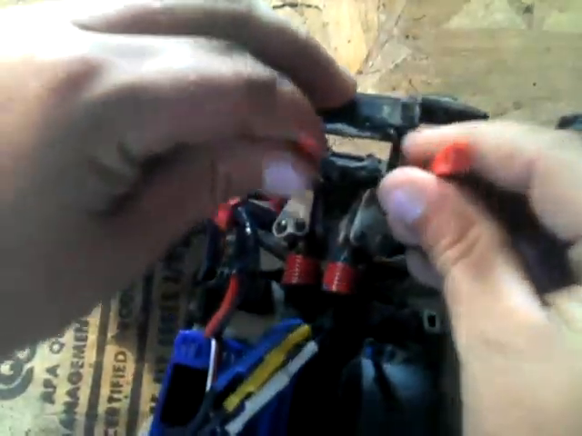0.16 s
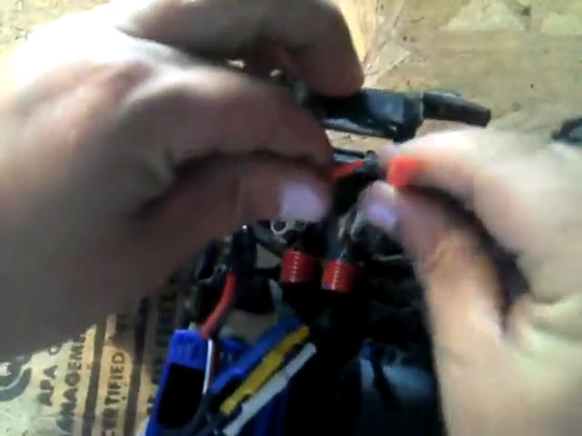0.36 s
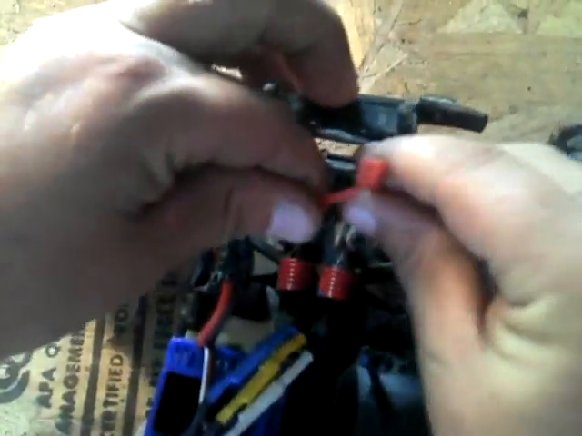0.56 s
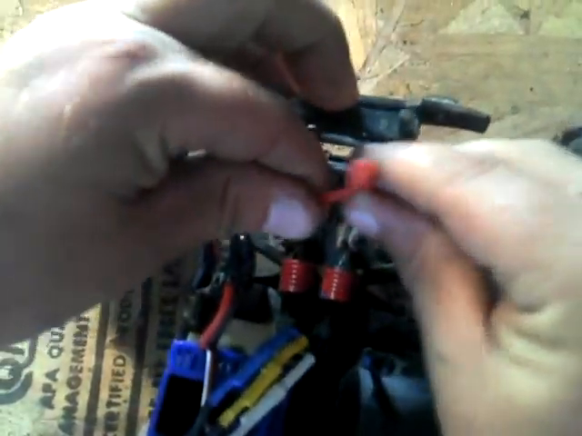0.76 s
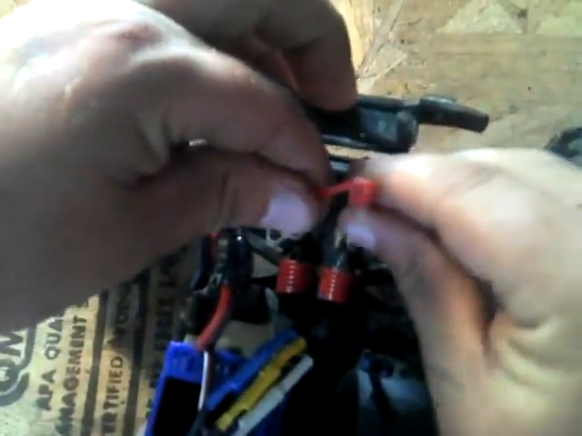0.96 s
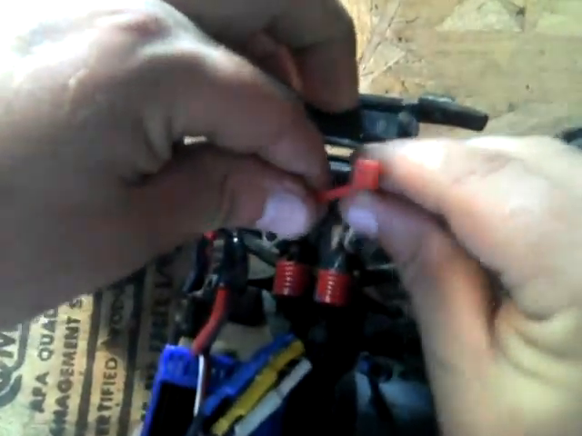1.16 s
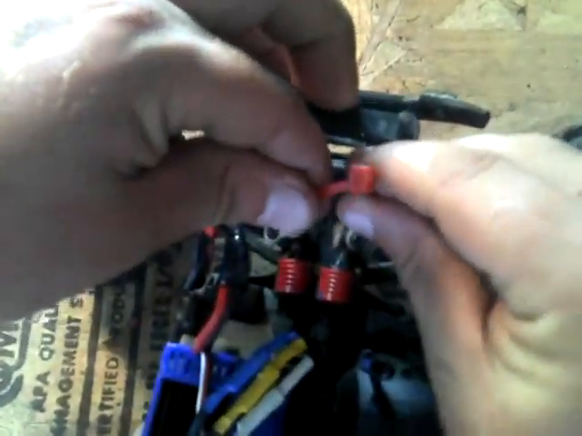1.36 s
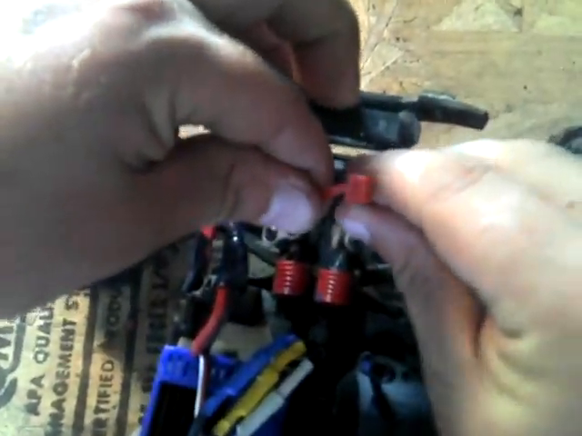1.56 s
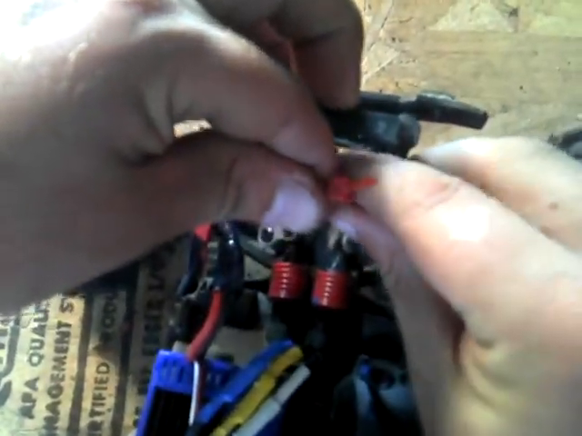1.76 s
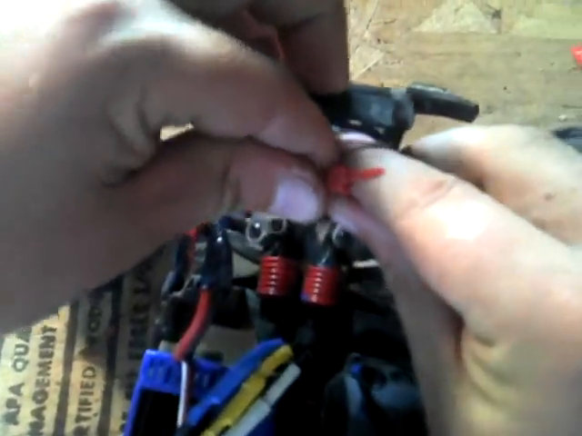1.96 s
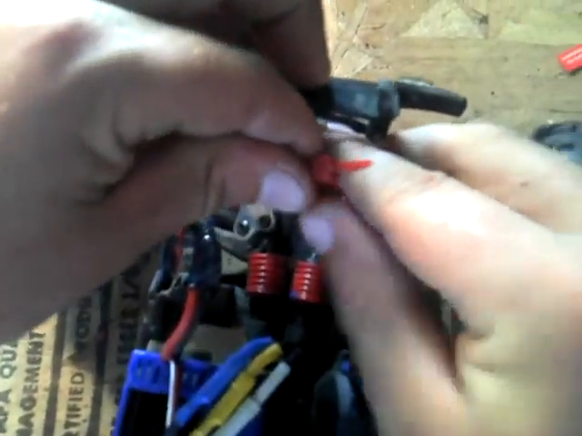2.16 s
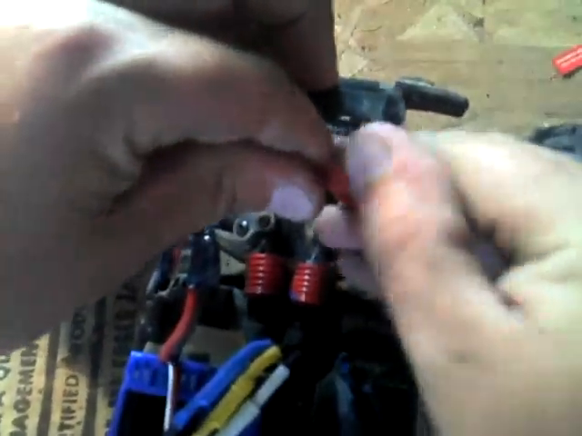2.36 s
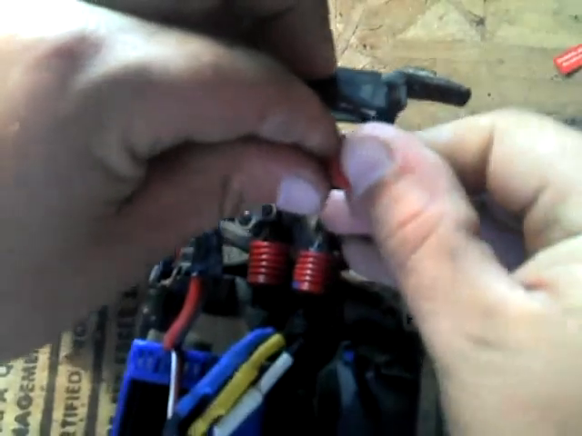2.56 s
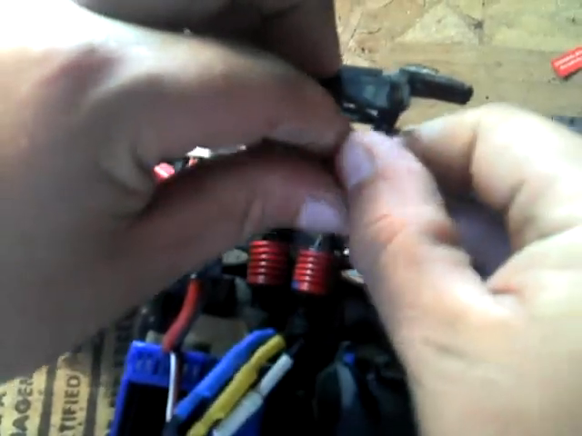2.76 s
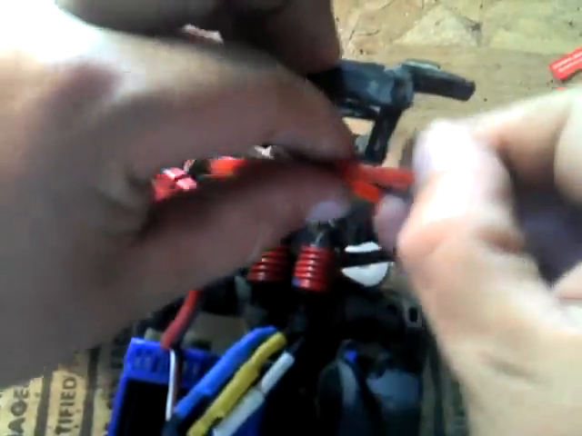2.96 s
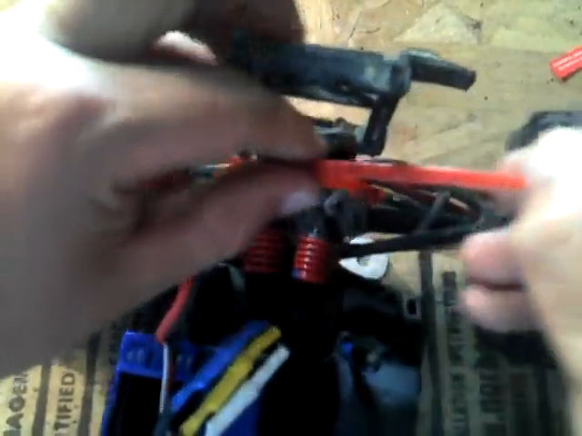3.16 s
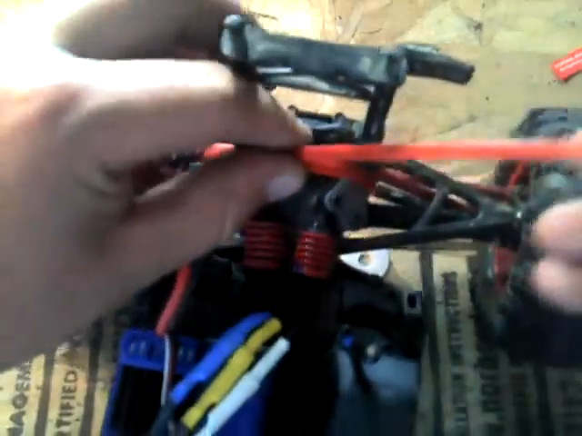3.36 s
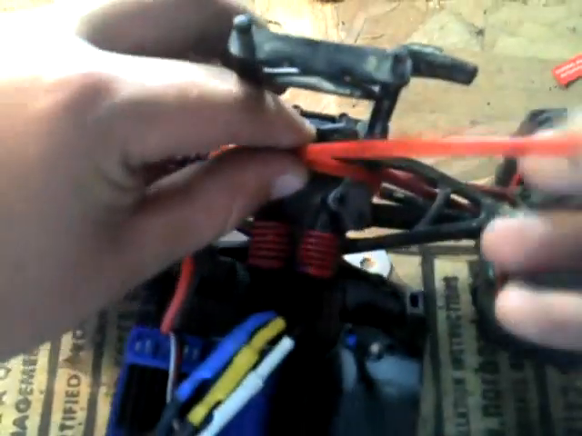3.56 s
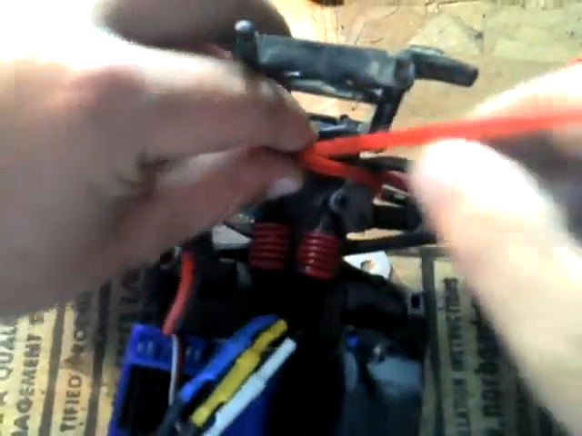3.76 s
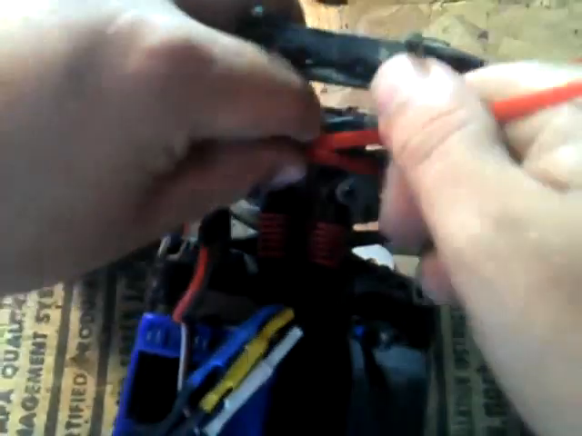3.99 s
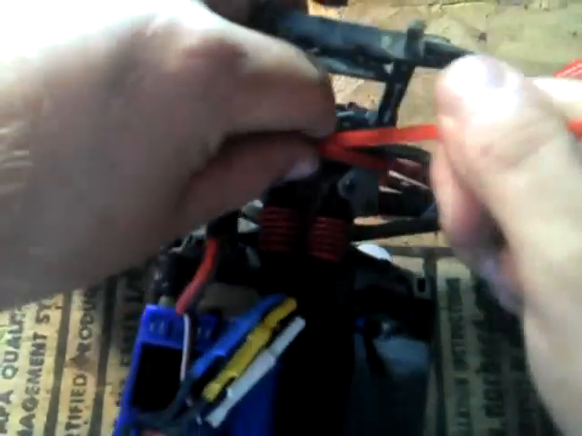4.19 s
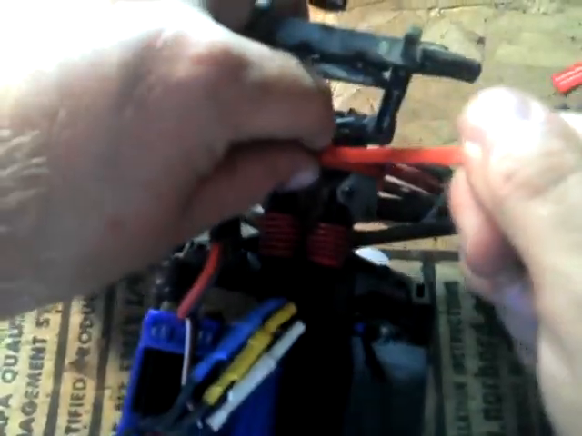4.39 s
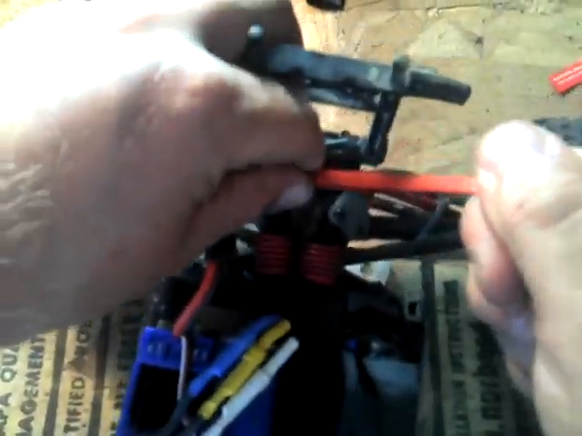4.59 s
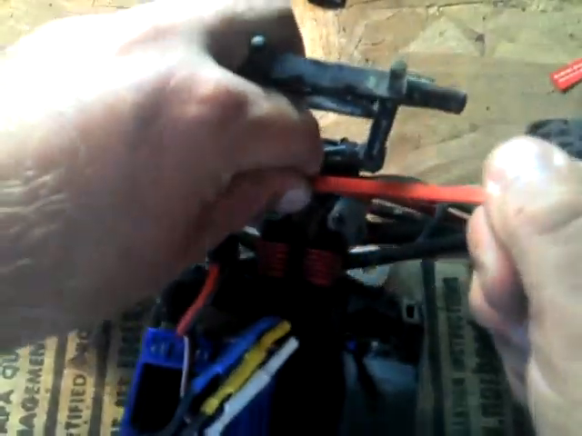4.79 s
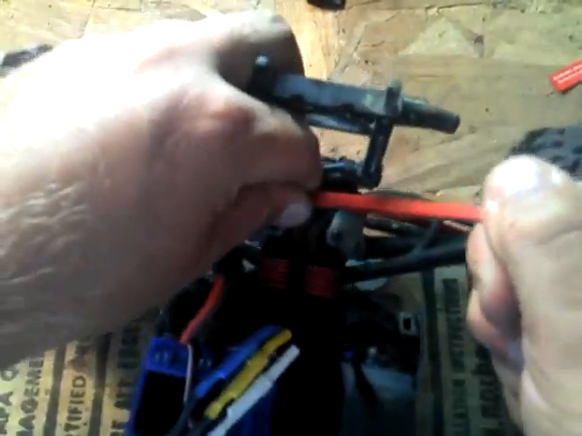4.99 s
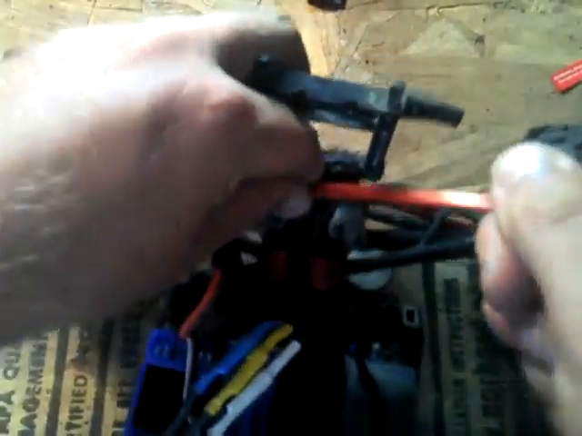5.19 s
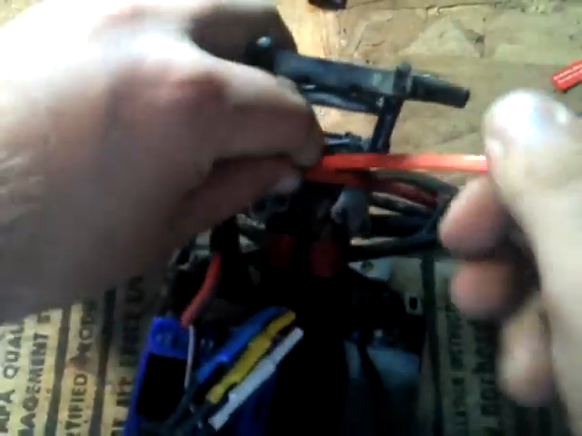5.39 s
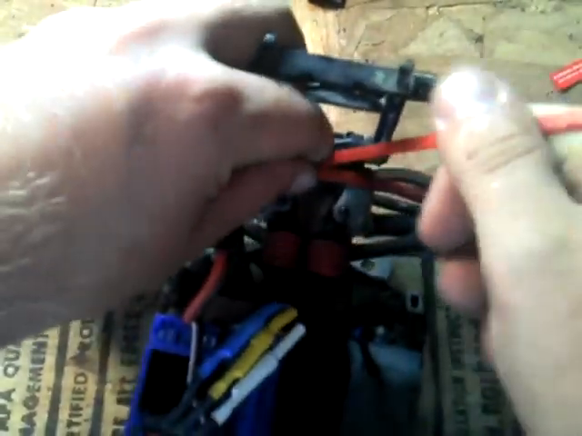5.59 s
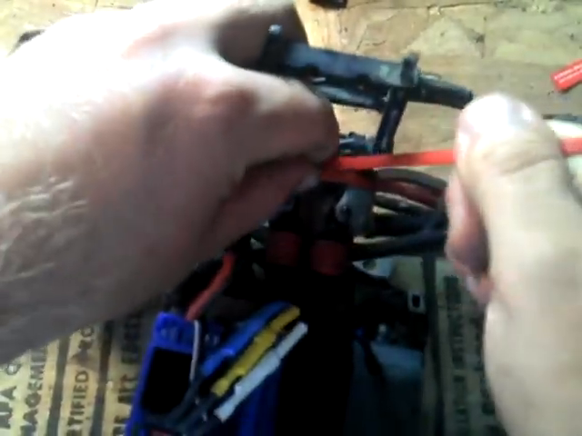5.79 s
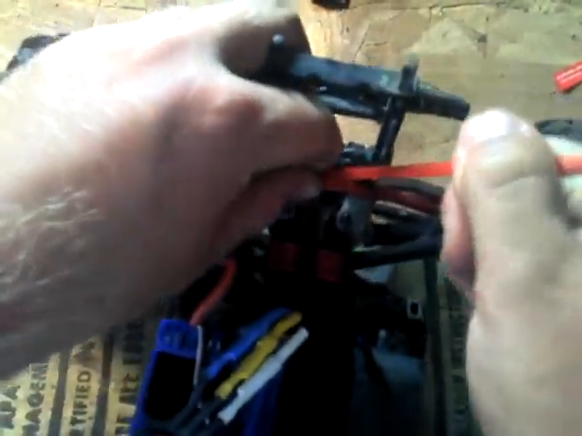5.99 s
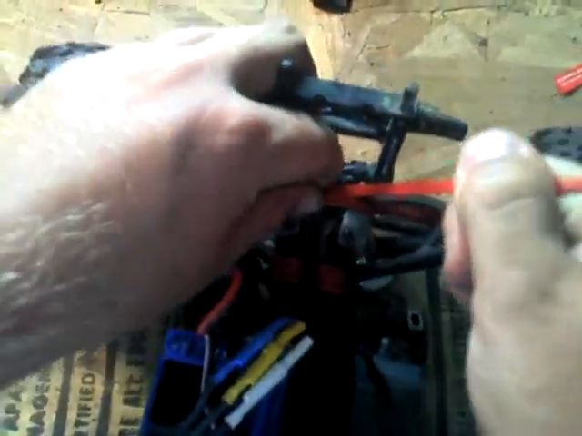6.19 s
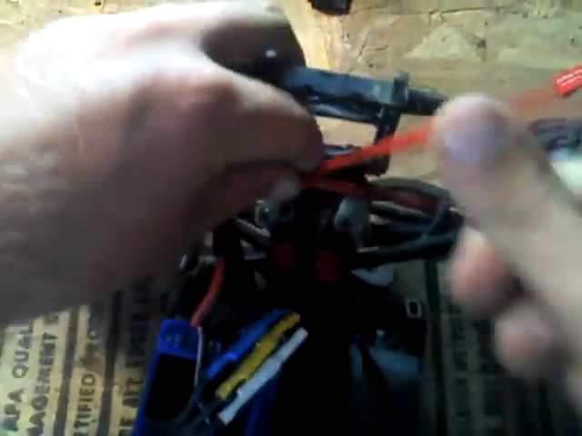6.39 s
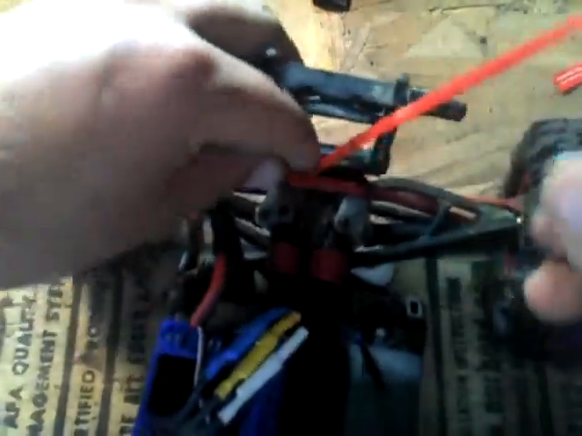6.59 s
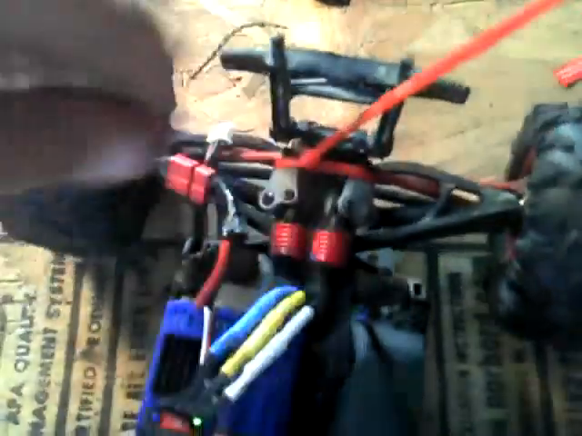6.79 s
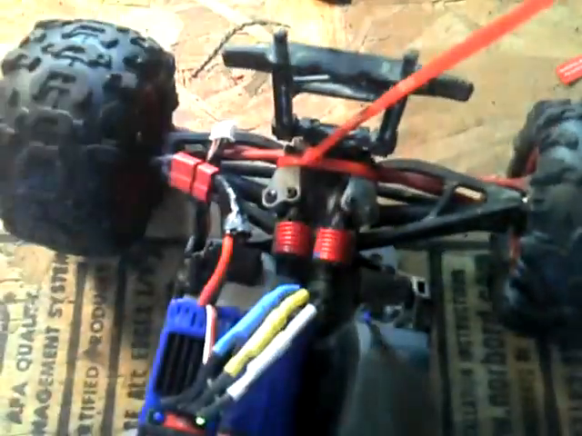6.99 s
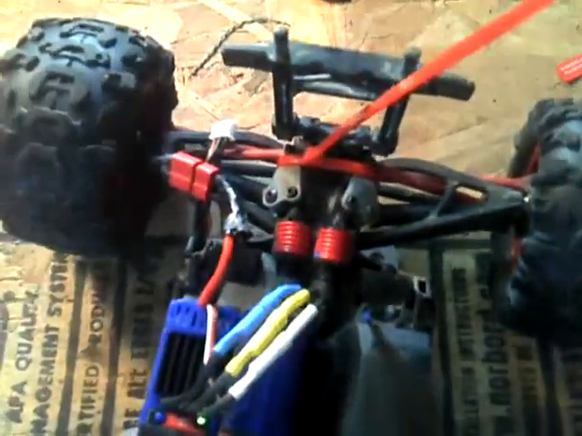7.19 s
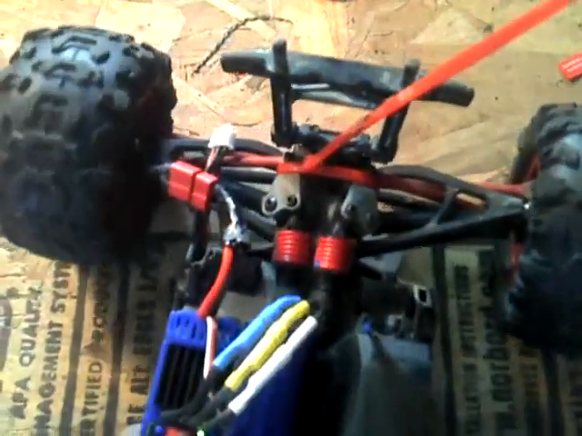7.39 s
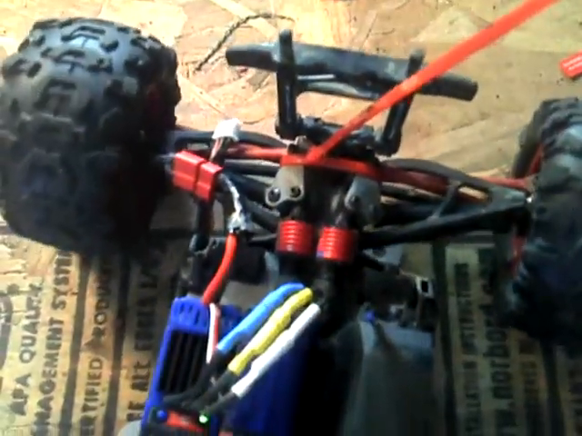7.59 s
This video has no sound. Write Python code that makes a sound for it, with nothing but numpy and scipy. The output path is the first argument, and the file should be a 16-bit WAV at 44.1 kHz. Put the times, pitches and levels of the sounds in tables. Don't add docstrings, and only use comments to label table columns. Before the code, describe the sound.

Very close in a quiet shed, fingers tick and rub softly on small plastic parts over faint hiss and a wavering low hum. After three seconds a nylon tie is yanked in loud, bright ratcheting zips, then creeps tight in separate sharp clicks. A pause with grip-shifting scuffs and a tiny squeak, four more clicks, then light fingertip ticks to the end.

```python
import sys
import numpy as np
from scipy import signal
from scipy.fft import rfft, irfft
from scipy.io import wavfile
from scipy.ndimage import uniform_filter1d

SR = 44100
rng = np.random.default_rng(int(sys.argv[2]) if len(sys.argv) > 2 else 0)


def rack_gain(trim_db):
    fader = np.asarray(trim_db, float)
    return 10 ** (fader / 20)


def store_wav(level_fs):
    pcm = np.round(np.clip(np.atleast_2d(level_fs), -1, 1) * 32767)
    wavfile.write(sys.argv[1], SR, pcm.T.astype(np.int16))


N = 337365


def unit(x):
    return x / np.sqrt(np.mean(x ** 2))


def shape(points, size):
    hz, db = np.transpose(points)
    bins_hz = np.fft.rfftfreq(size, 1 / SR)
    return rack_gain(np.interp(np.log(bins_hz + 1), np.log(hz), db))


def band(x, hz, width_hz):
    return signal.lfilter(*signal.iirpeak(hz, hz / width_hz, fs=SR), x, axis=-1)


def ring(t, hz, t60):
    t = np.clip(t, 0, 1)
    return rack_gain(-60 * t / t60) * np.sin(2 * np.pi * hz * t) * (1 - np.exp(-t / .0008))


def walk(rate_hz):
    hold = int(SR / rate_hz)
    return uniform_filter1d(np.repeat(rng.standard_normal(N // hold + 1), hold), hold)[:N]


def along(table, times):
    s, *columns = np.transpose(table)
    return np.array([np.interp(times, s, c) for c in columns])[:, :, None]


def add(out, s, sound):
    i = int(s * SR)
    out[i:i + len(sound)] += sound[:N - i]


# frequency_hz, density_db
AIR_SPECTRUM = [(15, -47), (25, -36.5), (64, -11), (103, -5.5), (133, 2), (523, -7), (728, -6.5),
                (1010, -9), (1250, -9.5), (2600, -14.5), (4470, -18), (7000, -22), (9100, -56),
                (15400, -120)]
# time_s, level_db
AIR_LEVEL = [
    (0.0, -64),
    (7.65, -65.5),
]


def air():
    hiss = unit(irfft(rfft(rng.standard_normal(N)) * shape(AIR_SPECTRUM, N), N))
    return rack_gain(np.interp(np.arange(N) / SR, *np.transpose(AIR_LEVEL))) * hiss


# middle_s, half_length_s, rise_db
HUM_LOADS = [
    (0, 0.091, 12),
    (0.846, 0.79, 12.5),
    (2.503, 0.21, 13.5),
    (2.945, 0.23, 8.5),
    (3.949, 0.32, 9),
    (6.163, 0.23, 15),
]


def hum():
    t = np.arange(N) / SR
    hum_hz, wander_hz = 118, 5
    level_db, flutter_db = -83, 1.5
    tone = np.sqrt(2) * np.sin(2 * np.pi * np.cumsum(hum_hz + wander_hz * walk(12)) / SR)
    load_db = sum(db * np.exp(-((t - s) / half) ** 4) for s, half, db in HUM_LOADS)
    return rack_gain(level_db + load_db + flutter_db * walk(9.3)) * tone


# delay_ms, level_db
WALLS = [
    (3.7, -21),
    (12.4, -27),
    (15.5, -26.5),
    (19.5, -31),
]


def shed(x, size=16384):
    t = np.arange(size) / SR
    wash_db, t60_s = -24.5, 0.45
    envelope = rack_gain(wash_db - 60 * t / t60_s) * (1 - np.exp(-t / 0.0017)) / 30
    for ms, db in WALLS:
        late = t - ms / 1000
        envelope = envelope + rack_gain(db) * (late > 0) * np.exp(-np.abs(late) / 0.0026) / 6
    return signal.fftconvolve(x, band(envelope * rng.standard_normal(size), 3300, 7700))[:N]


# time_s, level_db
RUB = [(0, -72), (.34, -74), (.7, -71.5), (1.0, -74.5), (2.26, -78), (2.66, -74), (3.14, -75.5),
       (3.19, -61.5), (3.85, -72.5), (4.29, -78.5), (4.48, -73), (5.5, -65.5), (5.63, -67.5), (5.79, -78),
       (6.35, -74), (6.54, -66.5), (6.8, -76.5), (7.65, -72.5)]


def rub():
    grit = rng.standard_normal(N) * rack_gain(2.5 * rng.exponential(size=N) + 2.0 * walk(40))
    hiss = unit(band(band(grit, 4500, 1900), 3300, 3100))
    return hiss * rack_gain(np.interp(np.arange(N) / SR, *np.transpose(RUB)))


# start_s, length_s, pitch_hz, width_hz, level_db
SCRAPES = [(0.0, .06, 3800, 2500, -59.0), (0.0, .05, 850, 300, -65.0), (1.947, .022, 4000, 2000, -57.0),
           (2.5, .016, 4200, 4000, -51.0), (3.115, .05, 4800, 1500, -61.0), (3.14, .055, 4800, 2200, -54.0),
           (3.168, .014, 1800, 1800, -59.0), (5.47, .018, 850, 400, -64.0), (5.547, .05, 1800, 1800, -63.0),
           (5.573, .012, 3500, 2500, -57.0), (5.64, .012, 3600, 3000, -47.0),
           (6.36, .008, 4000, 3000, -57.0), (6.643, .075, 4800, 3000, -66.0),
           (6.644, .012, 5000, 4000, -58.0), (6.646, .072, 1850, 420, -63.0),
           (7.26, .11, 3700, 1400, -71.0)]


def scrapes():
    out = np.zeros(N)
    for s, length, hz, width_hz, db in SCRAPES:
        grit = rng.standard_normal(6000) * rack_gain(1.5 * rng.exponential(size=6000))
        grit = unit(band(band(grit, hz, 1.1 * width_hz), hz, 1.1 * width_hz))
        grit = grit[-int(length * SR):]
        add(out, s, rack_gain(db) * grit * signal.windows.tukey(len(grit), .25))
    return out


# start_s, length_s, pitch_hz, level_db
SQUEAKS = [
    (5.657, .009, 1080, -57.0),
    (6.455, .012, 5200, -64.0),
    (6.793, .016, 5150, -68.0),
    (6.835, .02, 5150, -67.0),
]


def squeaks():
    out = np.zeros(N)
    for s, length, hz, db in SQUEAKS:
        t = np.arange(int(length * SR)) / SR
        add(out, s, rack_gain(db) * np.sqrt(2) * np.sin(2 * np.pi * hz * t) * np.hanning(len(t)))
    return out


# start_s, peak_db, pitch_hz
TICKS = [(0.0369, -37, 3900), (.154, -48, 4000), (.2057, -48.5, 4600), (.2734, -55, 4060),
         (0.3536, -51.5, 3730), (.5496, -53, 3500), (0.6122, -50.5, 4100), (.7017, -42.5, 3820),
         (.992, -47, 4600), (1.0306, -44, 3700), (1.1172, -49.5, 4550), (1.1964, -54.5, 4200),
         (1.496, -49.5, 4700), (1.5365, -40.5, 3770), (1.696, -42.5, 5030), (2.069, -50.5, 4200),
         (2.113, -54, 3380), (2.1915, -53, 4600), (2.4188, -47, 4450), (2.428, -46.5, 4500),
         (2.4694, -51.5, 4030), (2.5025, -50, 4030), (2.594, -50, 4170), (2.682, -53.5, 4550),
         (2.8372, -45.5, 4480), (2.8673, -54, 3930), (3.0887, -50, 3860), (3.149, -54, 4660),
         (3.1739, -34.5, 4500)]
# start_s, peak_db, pitch_hz
REGRIPS = [(3.917, -46.5, 3560), (4.0282, -49.5, 4960), (4.1696, -42.5, 3800), (4.192, -51, 4200),
           (4.231, -52, 3980), (4.323, -54, 3880), (5.548, -42, 4570), (5.556, -46, 4900),
           (5.5778, -44.5, 3720), (5.641, -32, 3960), (5.648, -39, 1810), (5.794, -55, 3940),
           (5.826, -49.5, 2500), (6.432, -43.5, 2180), (6.588, -48.5, 4400), (6.6475, -46.5, 2270),
           (7.049, -53, 2520), (7.281, -56, 3930), (7.3516, -53.5, 4100), (7.617, -52.5, 3830)]
BRUSHES = [.5788, .651, .7825, .8004, 1.3713, 1.7484, 2.6618, 4.071, 5.5083, 5.8571, 7.5245]
# start_s, peak_db, pitch_hz, length_ms
BUMPS = [
    (1.777, -52.5, 358, 4.1),
    (2.035, -59, 573, 9),
    (2.14, -57, 282, 6.9),
    (7.352, -57, 416, 8.2),
]


def taps():
    out, t = np.zeros(N), np.arange(1500) / SR
    brushes = [(s, -56, 4100 * rack_gain(0.56 * rng.standard_normal())) for s in BRUSHES]
    ticks = [(*row, 2.6 * rack_gain(1.8 * rng.standard_normal())) for row in TICKS + brushes + REGRIPS]
    skirt_db, edge_db = -7, -11.5
    for s, db, hz, ms in ticks + BUMPS:
        burst = rng.standard_normal(len(t)) * np.exp(-1000 * t / np.clip(0.53 * ms, .1, 9))
        tap = band(burst, hz, 0.16 * hz)
        tap = tap + rack_gain(skirt_db) * band(burst, hz / 2, hz / 2)
        tap = band(tap + rack_gain(edge_db) * burst, hz, 0.72 * hz)
        add(out, s, rack_gain(db + 3.5) * tap / np.abs(tap).max())
    return out


# time_s, teeth_passed
ZIPS = [
    [(3.333, 0), (3.3466, 2), (3.3755, 8), (3.4055, 15), (3.4436, 23), (3.4711, 29), (3.4876, 33),
     (3.5301, 45), (3.5459, 49)],
    [(3.6472, 0), (3.6551, 1), (3.6662, 3), (3.6754, 5), (3.6908, 9), (3.702, 12), (3.7107, 14),
     (3.7211, 16), (3.7285, 17)],
    [(4.4976, 0), (4.5215, 5), (4.5282, 6), (4.5363, 7), (4.5476, 8)],
]
STALLS = [3.2033, 3.2167, 3.2352, 3.3232, 3.5506, 3.5553, 3.5622, 3.5693, 3.5799, 3.6167, 3.6361, 3.7399]
CREEP = [4.5825, 4.6291, 4.6481, 4.6645, 4.6836, 4.7085, 4.7451, 4.776, 4.8015, 4.832, 4.8672, 4.8918,
         4.916, 4.9526, 4.9858, 5.0325, 5.1097, 5.1496, 5.1825, 5.2318, 5.3062, 5.3516, 5.4064, 6.3688,
         6.3919, 6.4183, 6.4646]
# time_s, snap_peak_db
FORCE = [(3.203, -25.6), (3.217, -17.1), (3.235, -15.1), (3.323, -13.5), (3.375, -14.9), (3.42, -17),
         (3.48, -14), (3.57, -11.2), (3.7, -10.2), (3.74, -7.4), (4.535, -7.8), (4.63, -11.3),
         (4.83, -12.5), (5.23, -17), (5.31, -16), (6.37, -16.6), (6.465, -18)]


def teeth():
    zips = []
    for points in ZIPS:
        s, passed = np.transpose(points)
        zips.append(np.interp(np.arange(passed[-1] + 1), passed, s))
    times = np.sort(np.concatenate(zips + [STALLS, CREEP]))
    quick = np.gradient(times) < .006
    jitter_s = .0002 * rng.standard_normal(len(times)) * quick
    peaks = np.interp(times, *np.transpose(FORCE)) + .5 * rng.standard_normal(len(times))
    return times + jitter_s, peaks


# time_s, finger_ms, finger_share, palm_ms, palm_share
HANDS = [(3.22, .6, 1.0, .46, 1.2), (3.34, .6, .8, .44, 1.4), (3.42, 0.48, .6, .38, 1.2),
         (3.46, .515, .6, 0.39, 1.1), (3.49, .485, .9, .35, 1.26), (3.55, .46, .7, 0.28, .3),
         (3.64, .44, .6, .3, .4), (3.74, .42, .4, 0.23, .4), (4.5, 0.45, .6, 0.2, .4),
         (4.54, .58, .4, .14, .6), (4.65, .56, .4, 0.16, .6), (4.8, .54, 0.098, .18, 0.35),
         (5.15, 0.37, -0.26, 0.19, .6), (5.41, .36, .2, 0.18, .5), (6.36, 0.42, -.4, .12, .8)]


def bounces(times, turn):
    finger_ms, finger_share, palm_ms, palm_share = along(HANDS, times)
    chassis_ms = 1.55 - 0.005 * np.arange(len(times))[:, None]
    paths = 1 + finger_share * np.exp(turn * finger_ms / 1000)
    paths = paths + palm_share * np.exp(turn * palm_ms / 1000)
    return paths + 0.1 * np.exp(turn * chassis_ms / 1000)


def clutter(count, t):
    level_db, decay_s, cutoff_hz = -4.5, 0.0021, 4500
    angle = 0.0941 * np.arange(count)[:, None]
    a, b = rng.standard_normal((2, len(t)))
    parts = np.cos(angle) * a + np.sin(angle) * b + .45 * rng.standard_normal((count, len(t)))
    parts = parts * np.clip(t / .001 - .5, 0, 1) * np.exp(-(t / decay_s) ** 2) * rack_gain(level_db) / 4
    return signal.lfilter(*signal.butter(1, cutoff_hz, fs=SR), parts)


# pitch_hz, t60_s, level_db, late_ms
CHASSIS = [
    (1070, .012, 2.0, 1.2),
    (1300, .011, -5.0, .82),
    (620, .012, -18.0, .4),
]
# pitch_hz, t60_s, level_db, late_ms
TOWER = [
    (1753, 0.0063, -0.1, 0.69),
    (2068, 0.0082, 3.5, 0.643),
    (2500, 0.009, -5, 0.696),
]
# time_s, chassis_db, tower_db, strap_hz, strap_db
GRIP = [
    (3.2, -39, -19.5, 700, -58.5),
    (3.4, -39, -27, 680, -14),
    (3.52, -35.5, -32, 270, -27.5),
    (3.6, -31, -45.5, 220, -36.5),
    (3.74, -30.5, -36, 500, -37),
    (4.49, -27, -33.5, 760, -12.5),
    (4.56, -28, -35, 500, -17.5),
    (4.7, -26.5, -22, 450, -50),
    (6.47, -27.5, -22, 450, -56),
]


def truck(times, t):
    seating_db, rattle_db, slack_ms = rng.standard_normal((3, len(times), 1)) * [[[1.5]], [[2.5]], [[.06]]]
    chassis_db, tower_db, strap_hz, strap_db = along(GRIP, times)

    def modes(table):
        return sum(rack_gain(db) * ring(t - (ms + slack_ms) / 1000, hz, t60) for hz, t60, db, ms in table)

    thump = rack_gain(chassis_db + seating_db) * modes(CHASSIS)
    rattle = rack_gain(tower_db + rattle_db) * modes(TOWER)
    strap = rack_gain(strap_db) * ring(t, strap_hz, 1.8 / strap_hz)
    return thump + rattle + strap


# frequency_hz, density_db
SNAP = [(150, -66.5), (750, -40), (1200, -23.5), (2000, -16), (2800, -7), (3500, 1.5), (4500, 1),
        (5500, 3.5), (6500, -1), (7200, -9), (7800, -8.5), (9000, -19)]


def ratchet(size=2048):
    times, peaks = teeth()
    t = np.arange(size) / SR
    turn = -2j * np.pi * np.fft.rfftfreq(size, 1 / SR)
    lead = .001
    paths = bounces(times, turn) + rfft(clutter(len(times), t))
    snaps = irfft(paths * shape(SNAP, size) * np.exp(turn * lead), size)
    snaps = snaps / np.abs(signal.hilbert(snaps)).max(axis=1, keepdims=True)
    snaps = snaps + truck(times, t - lead)
    out = np.zeros(N)
    for s, db, snap in zip(times, peaks, snaps):
        add(out, s - lead + .0002, rack_gain(db + 3.0) * snap)
    return out


def scene():
    near = rub() + scrapes() + squeaks() + taps() + ratchet()
    near = signal.sosfilt(signal.butter(2, 120, "high", fs=SR, output="sos"), near)
    sway = 2 * np.pi * 1.5 * np.arange(N) / SR
    room = shed(near * np.cos(sway)) + shed(near * np.sin(sway))
    return (near + room + air() + hum())[None]


def low_pass(x):
    return signal.sosfilt(signal.butter(12, 8250, fs=SR, output="sos"), x)


# frequency_hz, gain_db
MIC = [
    (6900, 0.0),
    (7250, -4.0),
    (7500, -18.0),
    (8200, -29.0),
    (8500, -80),
]


def record(dry):
    cut = irfft(rfft(dry) * shape(MIC, N), N)
    mix = cut + rack_gain(-100.5) * rng.standard_normal(dry.shape)
    return low_pass(mix)


dry = scene()
out = record(dry)
store_wav(out)
```